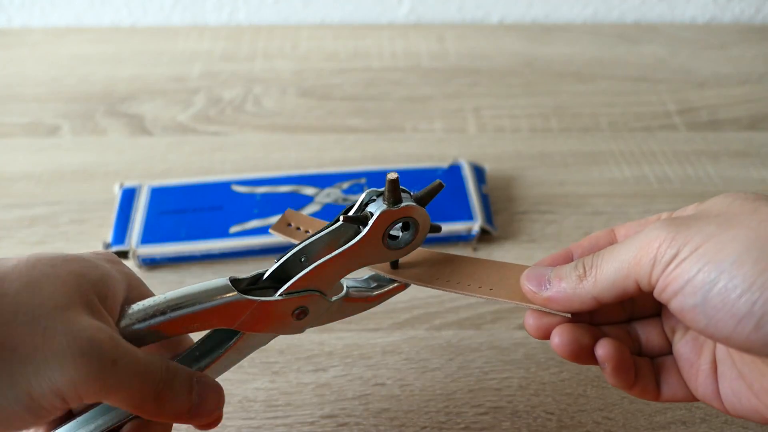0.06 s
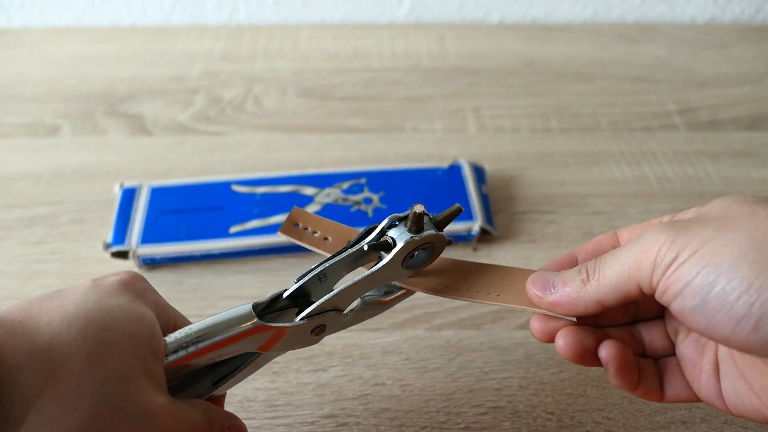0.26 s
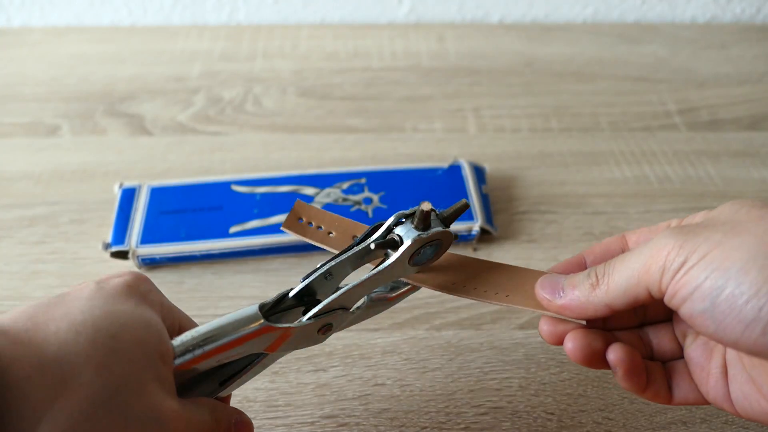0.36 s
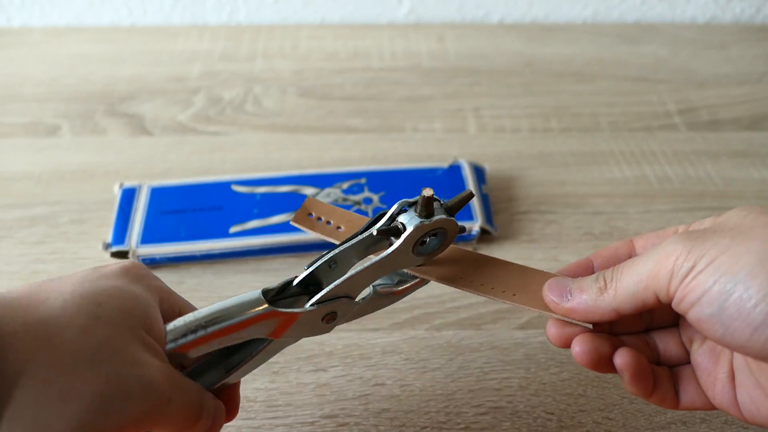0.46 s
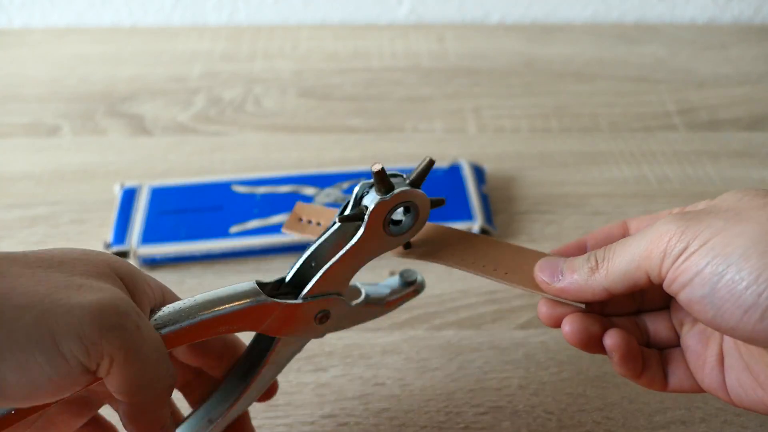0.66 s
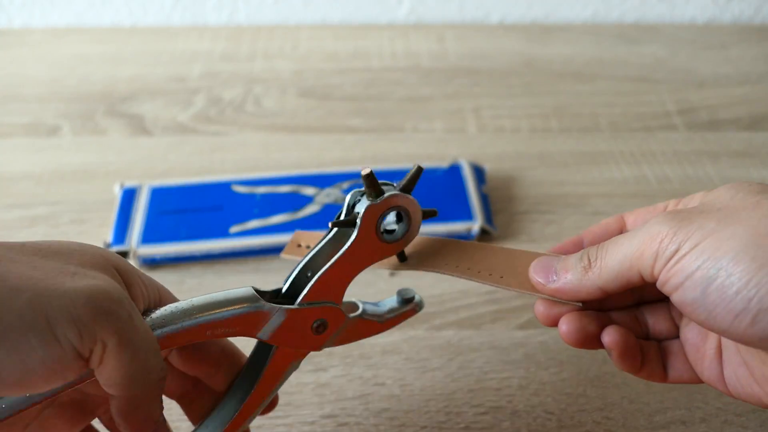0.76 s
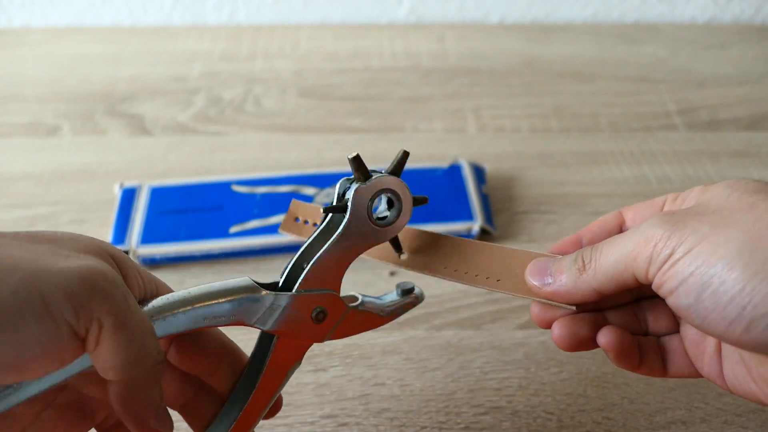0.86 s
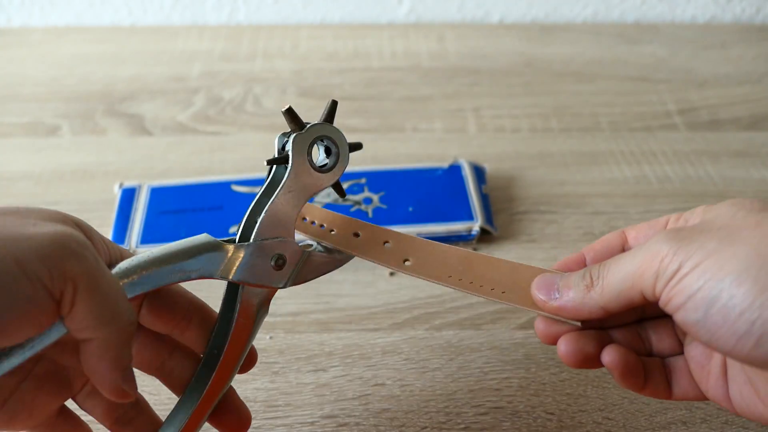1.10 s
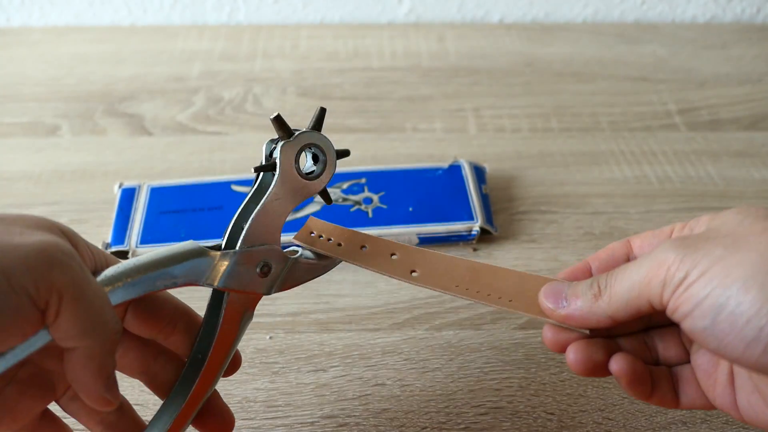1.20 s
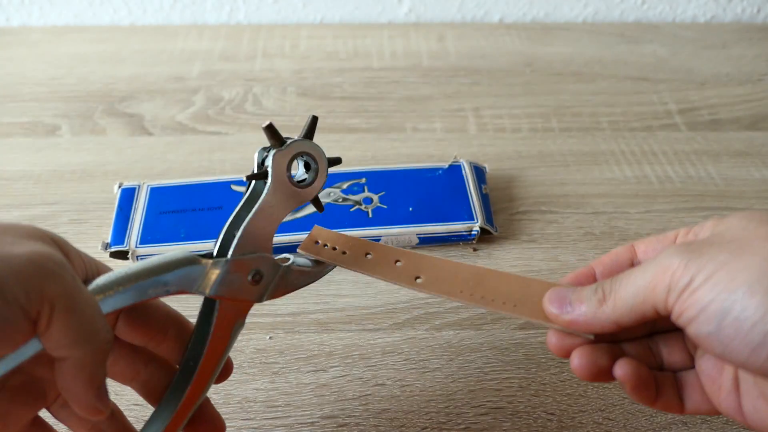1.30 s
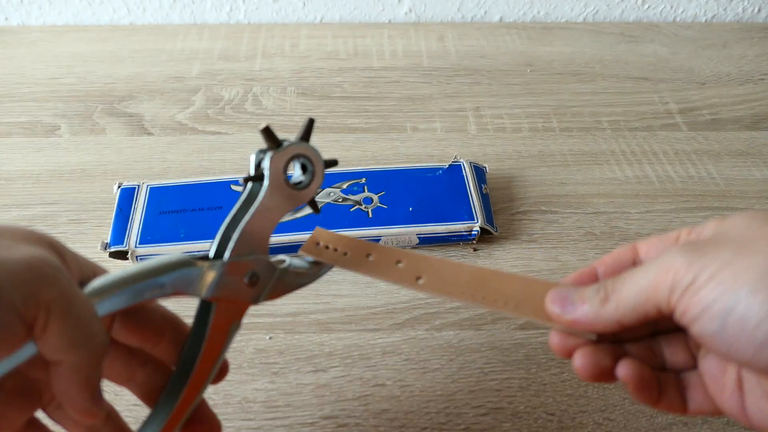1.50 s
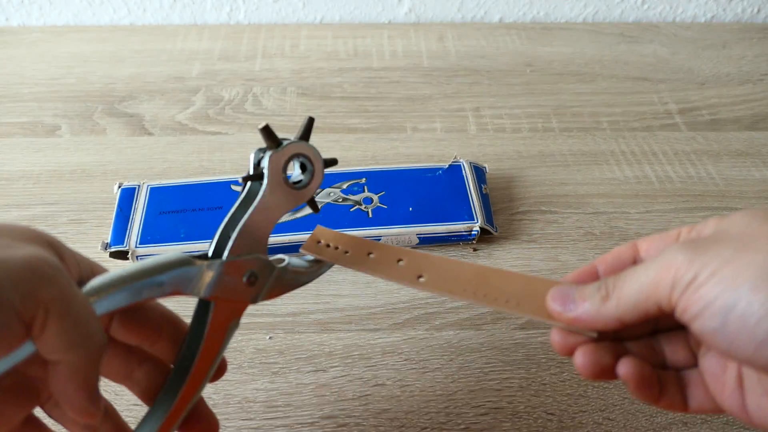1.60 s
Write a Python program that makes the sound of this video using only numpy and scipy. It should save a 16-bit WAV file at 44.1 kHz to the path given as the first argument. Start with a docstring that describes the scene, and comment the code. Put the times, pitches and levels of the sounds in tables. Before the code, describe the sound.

Punch pliers bite through leather with one loud metallic snap, then reopen with faint clicks.

```python
"""Two gritty clicks, then a loud snap: steel punch pliers bite through a leather strap in a quiet room.
Each steel contact chatters and rings the tool; the pivot squeaks, the leather groans and gives way.
Then the handles spring open, the punch pulls free and the strap taps the jaw.
A faint hum lies beneath; a limiter ducks it after the snap."""
import sys
import numpy as np
from scipy import signal
from scipy.fft import rfft, irfft
from scipy.io import wavfile
from scipy.ndimage import uniform_filter1d

SR = 44100
rng = np.random.default_rng(int(sys.argv[2]) if len(sys.argv) > 2 else 0)


def pcm_store(signal):
    """Save signal as 16-bit PCM."""
    levels = np.round(np.clip(np.atleast_2d(signal), -1, 1) * 32767)
    wavfile.write(sys.argv[1], SR, levels.astype(np.int16).T)


N = 72765
T = np.arange(N) / SR
FREQS = np.fft.rfftfreq(N, 1 / SR)
SNAP_S = .3336


def from_db(db):
    """Decibels to gain."""
    return 10 ** (np.asarray(db) / 20)


def at_hz(points, hz, column=1):
    """Read a table column on a log-frequency axis."""
    table = np.array(points)
    return np.interp(np.log(np.maximum(hz, 1)), np.log(table[:, 0]), table[:, column])


def shaped(x, colour, tilt_db=0):
    """Colour a sound and tilt it in dB per octave about 5 kHz; the tilt levels off below 2 kHz."""
    octaves = np.log2(np.maximum(FREQS, 2000) / 5000)
    return irfft(rfft(x) * from_db(at_hz(colour, FREQS) + tilt_db * octaves), N)


def low_cut(x, hz):
    """Roll off the lows at 12 dB per octave."""
    return signal.sosfilt(signal.butter(2, hz, "high", fs=SR, output="sos"), x)


def fader(points):
    """Gain riding a curve of seconds and dB."""
    return from_db(np.interp(T, *np.transpose(points)))


def noise(colour):
    """Steady noise of a given colour."""
    return shaped(rng.standard_normal(N), colour)


def wavering(hz, width):
    """A narrow band of noise, heard as a wavering tone of rms 1."""
    phases = np.exp(2j * np.pi * rng.random(len(FREQS)))
    tone = irfft(phases / (1 + ((FREQS - hz) / width * 2) ** 2), N)
    return tone / tone.std()


def burst(start, rise, decay):
    """An envelope with a quick rise and an exponential decay, timed in seconds."""
    age = T - start
    return np.clip(age / rise, 0, 1) ** .5 * np.exp(-np.maximum(age - rise, 0) / decay)


def strike(start, modes):
    """Modes set ringing by one blow, with alternating signs."""
    age = np.maximum(T - start, 0)
    return sum((-1) ** k * from_db(db - np.minimum(60 * age / t60, 200)) * np.sin(2 * np.pi * hz * age)
               for k, (hz, db, t60) in enumerate(modes))


def chatter(start, rise, decay, size=2048):
    """A burst of tiny irregular contacts, its energy spread fairly evenly over all frequencies."""
    first = int(start * SR)
    envelope = burst(start, rise, decay)[first:first + size]
    force = envelope * rng.standard_normal(size)
    for _ in range(2):  # flatten the spectrum while keeping the burst short
        spectrum = rfft(force)
        force = irfft(spectrum / np.abs(spectrum) ** .4) * envelope ** .1
    force *= np.linalg.norm(envelope) / np.linalg.norm(force)
    return np.pad(force, (first, N - first - size))


def opposed(x):
    """Put a sound in opposite phase on the two channels."""
    return np.array([x, -x])


def room_air():
    """A soft, wide bed of air: one noise shared by the channels, one opposed between them."""
    # Colours of the two noises. Each row: frequency in Hz, level in dB.
    mid_colour = [(25, -55.5), (80, -56.5), (150, -41), (400, -42), (650, -50.5), (1100, -50),
                  (1600, -57.5), (2200, -57), (3500, -66.5), (6000, -62), (10000, -64), (15000, -72.5)]
    side_colour = [(25, -52.5), (80, -46), (150, -33), (350, -31), (600, -39), (1200, -45), (2400, -58.5),
                   (4400, -66.5), (9000, -68), (15000, -73.5)]
    return noise(mid_colour) + opposed(noise(side_colour))


def hum():
    """Three faint wavering tones; the lowest swells after the snap."""
    # The upper tones. Each row: pitch in Hz, width in Hz, level in dB.
    tones = [(315, 22, -59.5), (872, 50, -70)]
    # The low tone's swell. Each row: time in seconds, level in dB.
    swell = [(0, -69), (.5, -70), (.64, -59), (.9, -56), (1.02, -68), (1.65, -70)]
    upper = sum(from_db(db) * wavering(hz, width) for hz, width, db in tones)
    return upper + fader(swell) * wavering(hz=181.74, width=2.5)


def leather_rub():
    """Leather slides on steel and skin with a faint hiss."""
    # The rub's swells. Each row: time in seconds, level in dB.
    swells = [(0, -89), (.17, -64), (.25, -47), (.3, -47.5), (.36, -76), (.61, -81), (.63, -58), (.67, -63),
              (.86, -60.5), (.91, -59), (1.0, -53), (1.06, -61), (1.65, -86.5)]
    # Its colour. Each row: frequency in Hz, level in dB.
    colour = [(200, -6.5), (1000, 5), (2500, -1), (6000, -4.5), (15000, -12)]
    return fader(swells) * noise(colour)


def steel_clicks():
    """Each contact chatters for milliseconds and rings the pliers; returns grit, side grit and ring."""
    # Steel contacts. Each row: start in seconds, grit level in dB, rise and decay in seconds,
    # tilt in dB per octave, ring level in dB, low cut of the grit in Hz.
    contacts = [(0.1880, -60, .003, .005, -6, -53.5, 900), (0.229, -22.5, .002, 0.0034, -2, -22, 300),
                (0.282, -45, 0.0012, 0.0072, 0, -42, 2500), (0.3068, -19, .003, 0.0034, -1.5, -16, 330),
                (0.3336, 5, .0003, .0016, 0.5, 6, 70), (0.599, -53, .001, .005, -3, -50, 2000),
                (0.729, -49.5, .001, .004, -4, -51, 2000), (0.7397, -32, 0.0012, 0.00367, -3, -32, 1600),
                (0.882, -31, .0005, .0022, .3, -35, 700), (0.8910, -41, .001, .004, -2.5, -48, 700),
                (0.9270, -52.5, 0.0018, 0.0041, 1, -58, 700)]
    # Modes of the hand-damped pliers. Each row: pitch in Hz, level in dB, t60 in seconds.
    modes = [(2376, -16.5, .02), (4460, -23, 0.012), (4500, -15.5, .025), (4760, -10, 0.032),
             (5280, -18, .025), (5740, -17.5, .022), (6404, -10, .022), (6655, -14.5, .022),
             (7935, -13, .027), (9100, -14, .025), (9730, -17, .022), (11970, -19, 0.018),
             (12450, -14.5, .016), (13750, -19, .018)]
    # The colour of steel grinding on steel. Each row: frequency in Hz, level in dB.
    grind = [(60, -30.5), (150, -11), (350, 2), (800, -1), (1650, -7.5), (2200, 3), (3200, -2), (4800, 5),
             (6500, 3.5), (10000, -2.5), (14000, -6.5), (16000, -17.5)]
    body = strike(0, modes)
    grit = side = ring = 0
    for start, grit_db, rise, decay, tilt_db, ring_db, low_hz in contacts:
        force = chatter(start, rise, decay)
        rung = signal.fftconvolve(force / np.linalg.norm(force), body)[:N]
        ring += from_db(ring_db) * shaped(rung, [(1, 0)], tilt_db)  # tilt only
        grit += from_db(grit_db) * shaped(low_cut(force, low_hz), grind, tilt_db)
        side += from_db(grit_db - 14) * shaped(chatter(start, rise, decay), grind, tilt_db)
    return grit, side, ring


def pivot_squeaks(pitch_hz=4890):
    """The loaded pivot gives two tiny squeaks."""
    # Each row: start in seconds, level in dB, rise and decay in seconds.
    squeaks = [(.2295, -35, 0.0029, .002), (.2822, -32, 0.0035, .002)]
    envelope = sum(from_db(db) * burst(start, rise, decay) for start, db, rise, decay in squeaks)
    return envelope * np.sin(2 * np.pi * pitch_hz * T)


def leather_thuds():
    """The leather gives way under the punch in short, low thuds."""
    # Each row: start in seconds, level in dB, pitch in Hz, t60 in seconds.
    thuds = [(.2305, -25, 312, .045), (0.3336, -10, 290, .016), (.3338, -18, 700.3, 0.012)]
    return low_cut(sum(strike(start, [(hz, db, t60)]) for start, db, hz, t60 in thuds), hz=110)


def strap_groan():
    """The squeezed strap groans briefly."""
    return from_db(-48.5) * burst(start=.262, rise=.02, decay=.009) * wavering(hz=300, width=160)


def punch_cut():
    """The punch tube rings as it cuts into the strap."""
    # Modes of the tube. Each row: pitch in Hz, level in dB, t60 in seconds.
    modes = [(545, -6, 0.016), (800, -1.5, .018), (1840, 0, .02), (5770, -0.5, 0.022), (10550, -3, 0.02),
             (11900, 0, .02)]
    return from_db(-24) * strike(start=.3086, modes=modes)


def wheel_ring():
    """The punch wheel rings on after the snap."""
    # Clusters of close modes. Each row: centre in Hz, width in Hz, level in dB, t60 in seconds.
    clusters = [(4790, 170, -28, .32), (2300, 260, -43, .28), (8115, 43.6, -54, .3)]
    return sum(from_db(db) * wavering(hz, width) * burst(SNAP_S, rise=.002, decay=t60 / np.log(1000))
               for hz, width, db, t60 in clusters)


def jolt():
    """A short, wide, dull bump under the snap."""
    # The bump's colour. Each row: frequency in Hz, level in dB.
    colour = [(30, -24.5), (100, -6.5), (250, 4.5), (700, 0.5), (1400, -3), (2500, -22), (8000, -47)]
    return opposed(shaped(chatter(SNAP_S, rise=.0005, decay=.0026), colour))


def strap_scuffs():
    """The strap scuffs against the jaw and fingers."""
    # Each row: start in seconds, level in dB, rise and decay in seconds, centre and width in Hz.
    scuffs = [(0.621, -58, .01, 0.017, 890, 197), (0.973, -57, 0.0031, 0.016, 1100, 400),
              (1.235, -58, .012, .012, 887, 130)]
    return sum(from_db(db) * burst(start, rise, decay) * wavering(hz, width)
               for start, db, rise, decay, hz, width in scuffs)


def spring_release():
    """The spring lets go with a small metallic tick."""
    # Modes of the spring. Each row: pitch in Hz, level in dB, t60 in seconds.
    modes = [(2390, -4, 0.029), (2750, -2, .04), (3540, -11, .015), (4250, -9, .015), (5520, -8, .015),
             (10850, -13, 0.015)]
    return from_db(-31.5) * strike(start=.7402, modes=modes)


def strap_taps():
    """The freed strap taps softly on the jaw."""
    # Each row: start in seconds, level in dB.
    taps = [(0.97, -43), (0.9927, -53), (1.3748, -44.5)]
    # Modes of a tap. Each row: pitch in Hz, level in dB, t60 in seconds.
    modes = [(1060, 1.5, 0.02), (1330, -1, .022), (1560, -0.5, 0.011), (2410, -5.5, .012),
             (2930, -8.5, 0.011)]
    return sum(from_db(db) * strike(start, modes) for start, db in taps)


def room(x, onset_s=.008, side_db=-8, echo_s=.0087, echo_db=-14.5):
    """One near reflection, then a diffuse tail that dies band by band."""
    # The reverb tail. Each row: frequency in Hz, level in dB, t60 in seconds.
    reverb = [(150, -18.5, 0.23), (700, -18, 0.44), (2285, -13, 0.38), (5000, -13.5, .3),
              (9000, -10.5, 0.31), (15000, -17.5, 0.1958)]
    edges_hz = np.geomspace(100, 17000, 29)
    white = rfft(rng.standard_normal((2, N)))
    tail = 0
    for low, high in zip(edges_hz, edges_hz[1:]):
        centre = np.sqrt(low * high)
        decay = at_hz(reverb, centre, column=2) / np.log(1000)
        gain = from_db(at_hz(reverb, centre)) * np.sqrt(2 / decay / SR)
        band = irfft(white * ((FREQS >= low) & (FREQS < high)), N)
        tail += gain * band * burst(onset_s / 2, onset_s, decay)
    mid, side = signal.fftconvolve(tail, x[None], axes=1)[:, :N]
    echo = from_db(echo_db) * np.interp(T - echo_s, T, x)
    return mid + from_db(side_db) * opposed(side) + echo


def scene():
    """The tool close up, slightly left; grit and leather fill the room more than the ring does."""
    grit, side_grit, pliers_ring = steel_clicks()
    ring = pliers_ring + pivot_squeaks() + punch_cut() + wheel_ring() + spring_release()
    leather = leather_thuds() + strap_groan() + strap_scuffs() + strap_taps() + leather_rub()
    pan = from_db([[.7], [-.7]])
    direct = (grit + leather + ring) * pan
    reverb_send = grit + leather + from_db(-8) * ring
    return direct + opposed(side_grit) + jolt() + room(reverb_send) + hum() + room_air()


def record(dry):
    """A limiter with slow release, then rounded peaks, a bass cut and a top cut."""
    threshold_db, release_db_per_s, detector_s = -9.5, 46.5, .0016
    window = int(detector_s * SR)
    power = uniform_filter1d(np.mean(dry ** 2, axis=0), window)
    over_db = np.maximum(10 * np.log10(np.maximum(power, 1e-12)) - threshold_db, 0)
    ramp = release_db_per_s * T
    duck_db = np.maximum.accumulate(over_db + ramp) - ramp  # grab each peak, then let go steadily
    ducked = dry * from_db(-uniform_filter1d(duck_db, window // 2))
    rounded = 2 * np.tanh(ducked / 2)
    top_cut = signal.ellip(10, .2, 70, 15700, fs=SR, output="sos")
    return signal.sosfilt(top_cut, low_cut(rounded, hz=62))


dry = scene()
out = record(dry)
pcm_store(out)
```